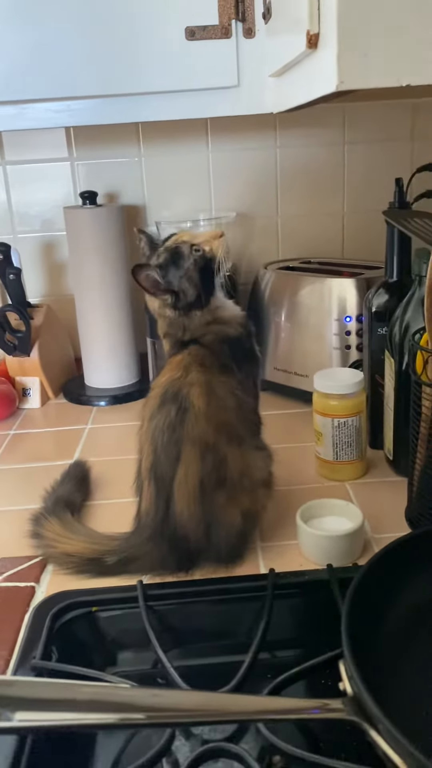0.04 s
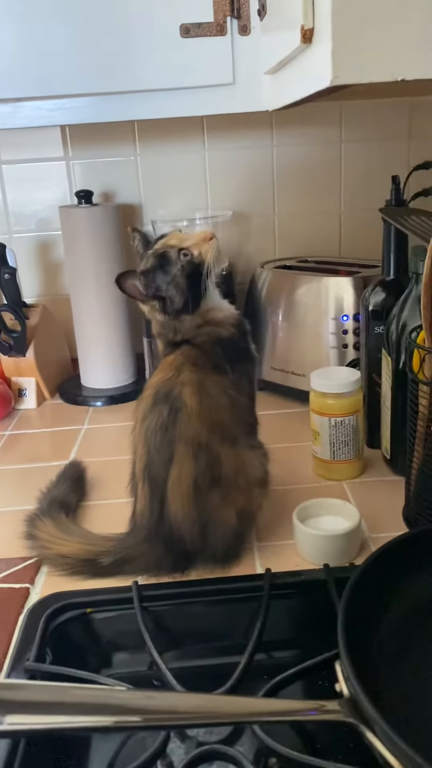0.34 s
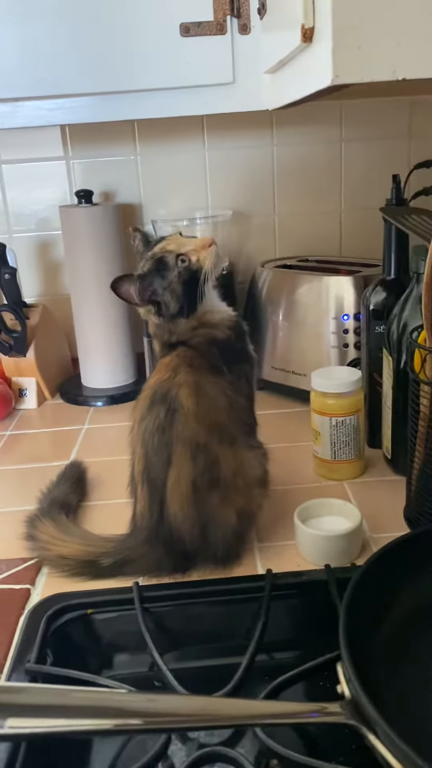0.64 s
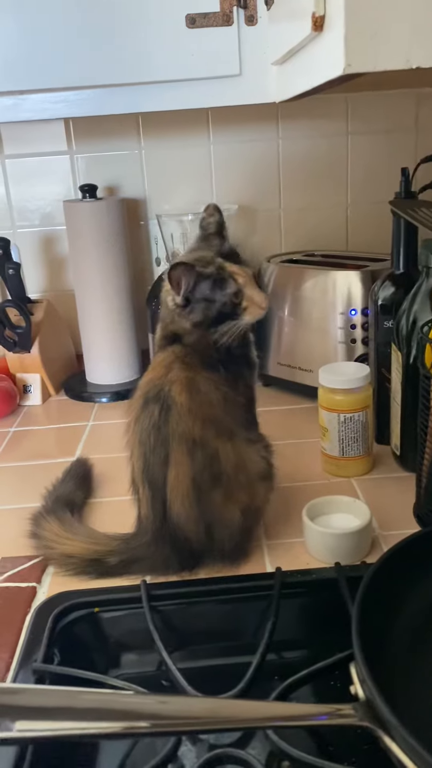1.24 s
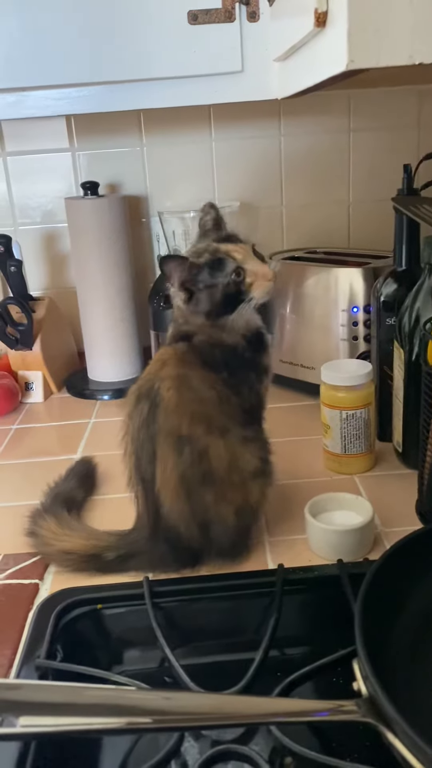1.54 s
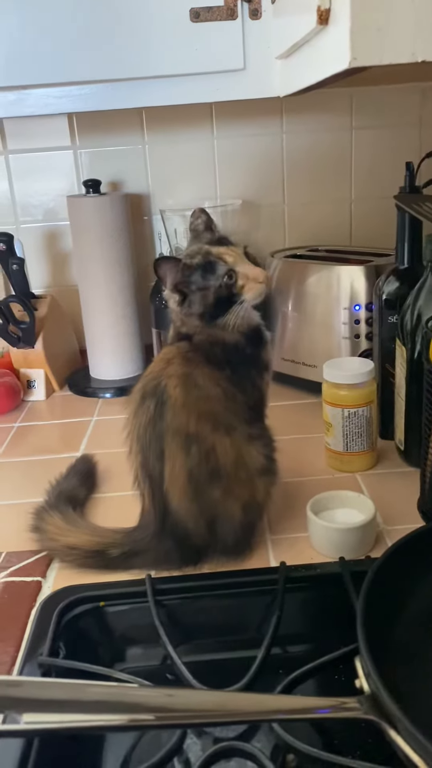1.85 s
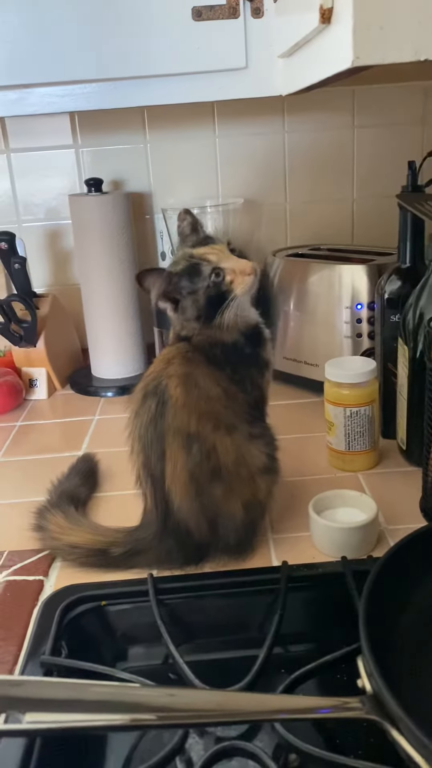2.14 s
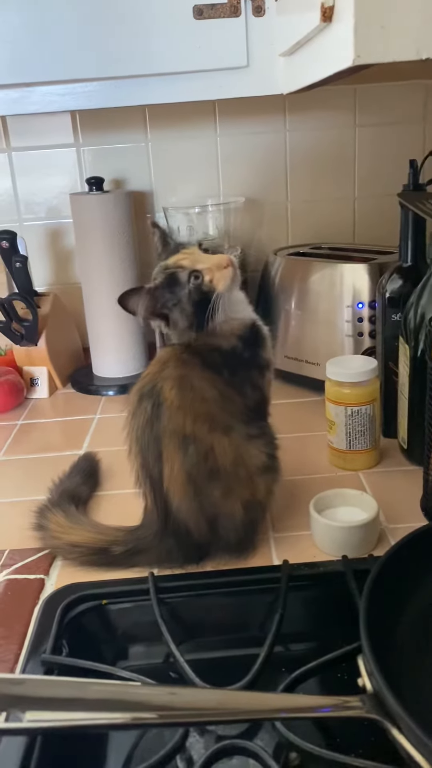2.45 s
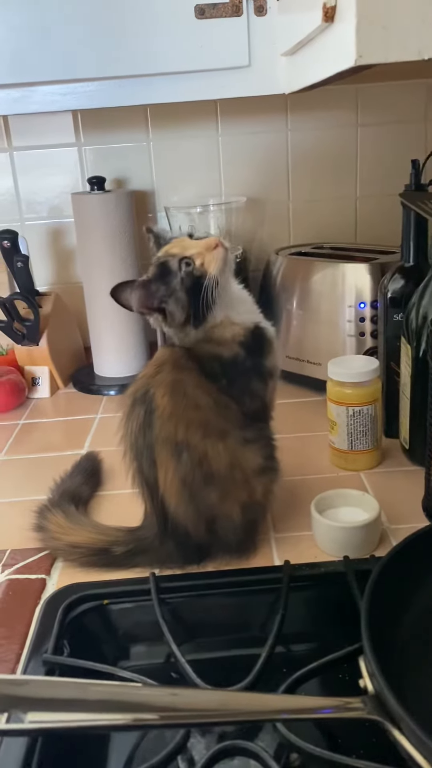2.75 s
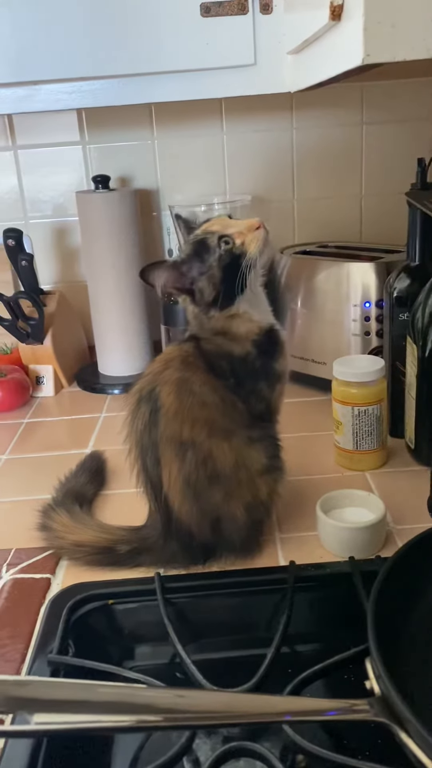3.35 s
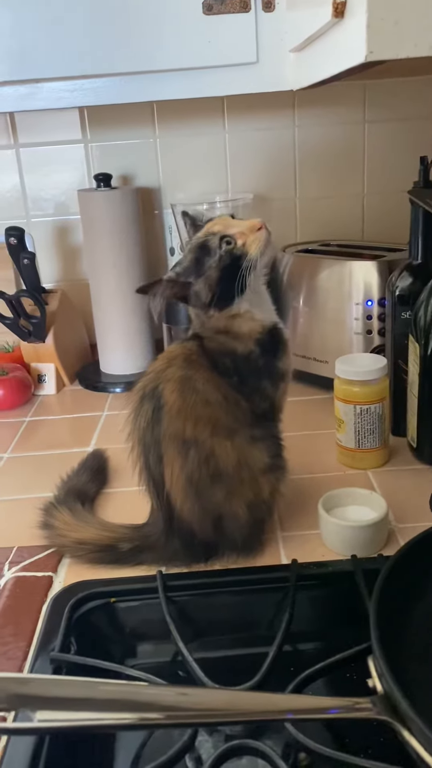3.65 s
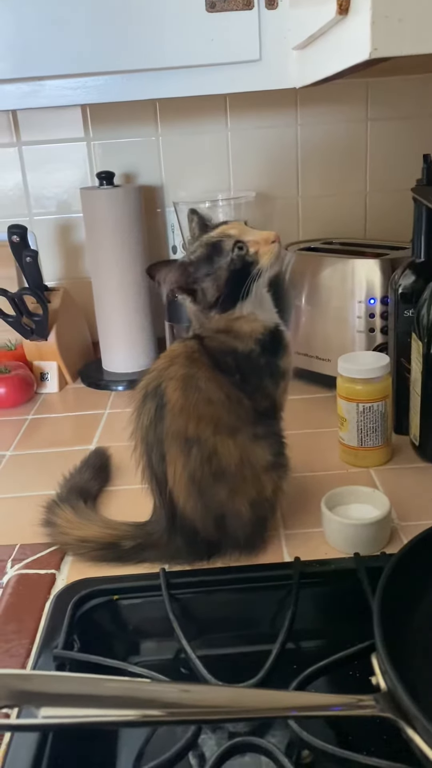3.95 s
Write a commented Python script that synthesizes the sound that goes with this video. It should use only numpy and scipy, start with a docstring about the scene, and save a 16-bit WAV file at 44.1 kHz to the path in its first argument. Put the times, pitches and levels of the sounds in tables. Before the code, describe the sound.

A cat gives one short, high, rising chirp that rings briefly off kitchen tiles. A second later comes a sharp little click. An appliance hums and rumbles softly throughout, with the microphone a short way from the counter.

```python
"""A tiled kitchen, stereo microphones within earshot of the counter. A cat up there gives one short,
high, rising chirp: a raspy voice shaped by throat and mouth, ringing off the tiles. Thin high tones
linger faintly after it. A second later a quick run of tiny contacts makes a sharp little click; a faint
tick and a soft rustle are barely there. Slightly to the left an appliance's motor hums and rumbles
throughout, over the rush of room tone."""
import sys
import numpy as np
from scipy import signal
from scipy.io import wavfile

SR = 44100
rng = np.random.default_rng(int(sys.argv[2]) if len(sys.argv) > 2 else 0)


def pcm_store(signal):
    """Save signal as 16-bit PCM."""
    levels = np.round(np.clip(np.atleast_2d(signal), -1, 1) * 32767)
    wavfile.write(sys.argv[1], SR, levels.astype(np.int16).T)


N = 176400
TIME = np.arange(N) / SR


def cat_chirp():
    """Vocal folds swell, arch up in pitch and dull; the harder the push, the more trill and jitter."""
    # pitch of the voice: t/s, f/Hz
    pitch = [(1.795, 1335), (1.808, 1335), (1.818, 1380), (1.828, 1412), (1.843, 1450), (1.853, 1470),
             (1.862, 1420)]
    # resonances of throat and mouth: f/Hz, width/Hz, gain/dB
    throat = [(1390, 400, -.5), (2820, 950, -6.5), (4300, 600, -35), (5560, 600, -11), (6850, 650, -14.5),
              (8450, 250, -29)]
    start_s, peak_s, end_s, attack_s, release_s = 1.792, 1.833, 1.846, .014, .026
    voice_db, onset_db, rasp_db, dulling_db_per_s = -49, -10, -16, 70
    jitter, shimmer_db, flutter_hz = .02, 3, 200
    trill_hz, trill_depth, trill_bend = 125, .65, .025
    wobble_rad, wobble_hz = .8, 90
    effort = from_db(np.interp(TIME, [start_s, peak_s], [onset_db, 0]))
    trill = effort * np.sin(2 * np.pi * trill_hz * TIME)
    bend = 1 + jitter * effort * drift(flutter_hz) + trill_bend * trill
    hz = np.interp(TIME, *np.transpose(pitch)) * bend
    phase = 2 * np.pi * np.cumsum(hz) / SR
    # past the peak, each harmonic fades faster than the one below
    slope_db = -dulling_db_per_s * np.clip(TIME - peak_s, 0, 1)
    folds = from_db(rasp_db) * rng.standard_normal(N) * (1 + np.cos(phase))
    for k in range(1, 7):
        # each harmonic wavers on its own, which makes the voice hoarse
        wobble = wobble_rad * min(k / 2, 1) * effort * drift(wobble_hz)
        harmonic_db = shimmer_db * drift(flutter_hz) + (k - 0.5) * slope_db
        folds += from_db(harmonic_db) * np.sin(k * phase + wobble)
    attack = np.clip((TIME - start_s) / attack_s, 0, 1)
    release = np.clip(1 - (TIME - end_s) / release_s, 0, 1) ** 2
    voice = from_db(voice_db) * folds * attack * release * effort * (1 + trill_depth * trill)
    left, right = kitchen(body(voice, throat), tail_db=-2)
    return np.array([left, delayed(right, ms=0.048)])  # the left microphone hears the cat first


def click():
    """Three tiny contacts within five milliseconds make one crisp click; a faint touch follows."""
    # contacts: t/s, level/dB
    contacts = [(2.8373, -53), (2.8388, -47), (2.8422, -50.5), (2.925, -70)]
    # resonances of the struck object: f/Hz, width/Hz, gain/dB
    modes = [(1500, 900, -4), (2500, 1000, -12), (3780, 600, -7), (4950, 800, -6), (5480, 750, -1),
             (6300, 800, -16), (8300, 700, -17), (12000, 1400, -21)]
    gain_db, low_cut_hz = 11, 1000
    envelope = sum(from_db(db) * dying(start_s, decay_s=0.00054) for start_s, db in contacts)
    ring = body(rng.standard_normal(N) * envelope, modes)
    low_cut = signal.butter(2, low_cut_hz, "high", fs=SR, output="sos")
    return kitchen(from_db(gain_db) * signal.sosfilt(low_cut, ring), tail_db=-1.5)


def tick():
    """A short scratch of noise rings two resonances: one faint tick."""
    # resonances of the tick: f/Hz, width/Hz, gain/dB
    modes = [(3690, 250, 4.5), (5430, 2000, -19.5)]
    force = from_db(-50.5) * rng.standard_normal(N) * dying(start_s=.126, decay_s=.003)
    return kitchen(body(force, modes), tail_db=-8)


def rustle():
    """Two soft brushes of noise swell and fade, barely reaching the microphones."""
    # bell-shaped swells: centre t/s, spread/s, level/dB
    brushes = [(2.915, 0.018, -83.5), (3.205, 0.021, -78)]
    # colour of the rustle: f/Hz, relative density/dB
    spectrum = [(2000, -1.5), (4000, 7.5), (5800, 7), (7500, -27), (12000, -29)]
    envelope = sum(from_db(db) * np.exp(-((TIME - centre_s) / spread_s) ** 2 / 2)
                   for centre_s, spread_s, db in brushes)
    return envelope * banded_noise(spectrum)


def appliance():
    """Wavering motor tones over a rumble in low resonances, a little nearer the left microphone."""
    # motor tones: f/Hz, level/dB, waver/dB
    hum = [(119.9, -50.5, 1.5), (356.5, -67, 3.5), (409.2, -56, 1.98), (496, -82, 2), (653, -83.5, 4.5),
           (775, -80, 3), (897.5, -83, 2.5)]
    # low resonances of cabinet and room: f/Hz, width/Hz, level/dB
    rumble = [(54.5, 12, -54), (76.04, 12, -50.5), (89.96, 7.6, -50), (150.4, 14, -58.5),
              (242.3, 14.5, -61), (339, 119, -63), (769, 62, -73)]
    wander_hz, left_bias_db = .4, 3.5
    mics = np.zeros((2, N))
    for k, (hz, db, waver_db) in enumerate(hum):
        phase = 2 * np.pi * np.cumsum(hz + wander_hz * drift(rate_hz=2.18)) / SR
        pan_db = left_bias_db * (k > 0) * np.array([[.5], [-.5]])  # lowest tone equal on both sides
        mics += np.sqrt(2) * from_db(db + waver_db * drift(rate_hz=5.5) + pan_db) * np.sin(phase)
    for hz, width, db in rumble:
        noise = rng.standard_normal(N + SR // 2)
        mics += from_db(db) * rms_one(resonate_twice(noise, hz, 2 * width)[-N:])
    return np.array([mics[0], delayed(mics[1], ms=0.026)])


def thin_high_tones():
    """Thin high tones linger faintly after the chirp and waver, each on its own."""
    # tones of narrow noise: f/Hz, width/Hz, base level/dB
    bands = [(2740, 230, -88), (4130, 230, -93), (5620, 89, -93.5), (6570, 200, -102)]
    # they come up around the chirp and stay for about 1.5 s: t/s, gain/dB
    swell = [(0, -6.5), (1.75, -11.5), (1.95, -1.5), (2.9, -0.5), (3.42, -2), (3.55, -15.5), (4, -10.5)]
    tones, waver_db = 0, 3
    for hz, width, db in bands:
        tone = rms_one(resonate_twice(rng.standard_normal((2, N)), hz, 2 * width))
        tones += from_db(db + waver_db * drift(rate_hz=5)) * tone
    return from_db(np.interp(TIME, *np.transpose(swell))) * tones


def room_tone():
    """The room's broad, steady rush, strongest in the bass."""
    # colour of the rush: f/Hz, relative density/dB
    spectrum = [(22, -20), (40, -2.5), (100, 0.5), (190, -9), (320, -7), (480, -11.5), (720, -12),
                (1000, -19.5), (1400, -22.5), (2000, -31.5), (3000, -41.5), (4200, -45.5), (5000, -51),
                (5800, -47.5), (7000, -52), (9000, -75), (13000, -53.5)]
    return from_db(-55) * banded_noise(spectrum)


def kitchen(x, tail_db):
    """At the microphones: direct sound, hard reflections, a tail the tiles hold longest in the treble."""
    # bounces off counter, wall and cupboard: left delay/ms, right delay/ms, level/dB
    reflections = [(2.1, 2.2, -15), (4.95, 4, -10), (11.42, 9.8, -3.5), (14.04, 14.3, -21), (25.2, 17, -18)]
    # diffuse tail: low f/Hz, high f/Hz, t60/s, left-right likeness
    tail_bands = [(700, 2000, .26, .7), (2000, 4800, .27, .3), (4800, 6700, .33, .2)]
    build_s = .004
    early = np.array([x + sum(from_db(row[2]) * delayed(x, row[mic]) for row in reflections)
                      for mic in (0, 1)])
    t, tail = TIME[:SR // 2], 0
    for low, high, t60, alike in tail_bands:
        noise = stereo(*rng.standard_normal((2, len(t))), alike)
        fade = from_db(-60 * t / t60) * (1 - np.exp(-t / build_s))
        band = signal.butter(3, [low, high], "band", fs=SR, output="sos")
        tail += signal.sosfilt(band, noise * fade / np.sqrt(2 * np.sum(fade ** 2)))
    return early + from_db(tail_db) * signal.fftconvolve(x[None], tail, axes=1)[:, :N]


def banded_noise(spectrum):
    """Stereo noise of rms 1, built band by band: centred in the bass, wide in the treble."""
    # how alike the two microphones hear the room: f/Hz, left-right likeness
    likeness = [(60, .998), (130, 1), (300, .7), (600, .1), (1200, 0.59), (2500, 0), (8000, 0)]
    noise, edges_hz = 0, np.geomspace(18, 16000, 26)
    white = rng.standard_normal((2, 2, N + SR // 4))
    for k, (low, high) in enumerate(zip(edges_hz, edges_hz[1:])):
        band = signal.butter(3, [low, high], "band", fs=SR, output="sos")
        mid, side = signal.sosfilt(band, white[k % 2])[:, -N:]
        hz = np.sqrt(low * high)
        noise += from_db(at_hz(spectrum, hz)) * stereo(mid, side, at_hz(likeness, hz))
    return rms_one(noise)


def stereo(mid, side, alike):
    """Mid and side to left and right; likeness 1 is mono, 0 is wide."""
    return np.sqrt(1 + alike) * mid + np.sqrt(1 - alike) * side * np.array([[1], [-1]])


def body(x, modes):
    """Resonances side by side, all driven by the same signal."""
    return sum(from_db(db) * resonate_twice(x, hz, width) for hz, width, db in modes)


def resonate_twice(x, hz, width_hz):
    """A resonance with peak gain 1, applied twice so that its flanks fall steeply."""
    r = np.exp(-np.pi * width_hz / SR)
    b = np.array([1, 0, -1]) * (1 - r * r) / 2
    a = [1, -2 * r * np.cos(2 * np.pi * hz / SR), r * r]
    return signal.lfilter(b, a, signal.lfilter(b, a, x + 1e-18) + 1e-18)


def drift(rate_hz):
    """A smooth random wander of rms 1."""
    hop, settle = 40, 2000
    r = np.exp(-2 * np.pi * hop * rate_hz / SR)
    noise = rng.standard_normal(N // hop + settle + 2)
    slow = signal.lfilter([1], [1, -2 * r, r * r], noise)[settle:]
    return np.interp(np.arange(N) / hop, np.arange(len(slow)), rms_one(slow))


def dying(start_s, decay_s):
    """A sudden start and an exponential decay."""
    return (TIME >= start_s) * np.exp(-np.maximum(TIME - start_s, 0) / decay_s)


def delayed(x, ms):
    """The same sound a little later."""
    return np.interp(TIME - ms / 1000, TIME, x, left=0)


def at_hz(points, hz):
    """Read a table on a log-frequency axis."""
    f, value = np.transpose(points)
    return np.interp(np.log(hz), np.log(f), value)


def from_db(db):
    """Decibels to gain."""
    return 10 ** (np.asarray(db) / 20)


def rms_one(x):
    """Scale to rms 1."""
    return x / np.sqrt(np.mean(x ** 2) + 1e-20)


def scene():
    """The cat and the small sounds over the kitchen's hum."""
    return cat_chirp() + click() + tick() + rustle() + appliance() + thin_high_tones() + room_tone()


def record(dry):
    """A steep high cut on both microphones."""
    stop_db, stop_hz = 70, 15500
    return signal.sosfilt(signal.cheby2(12, stop_db, stop_hz, fs=SR, output="sos"), dry)


dry = scene()
out = record(dry)
pcm_store(out)
```